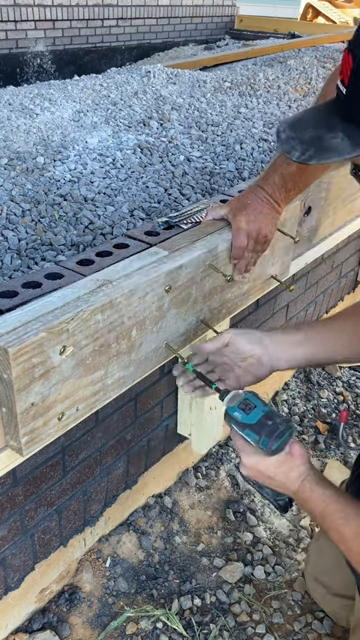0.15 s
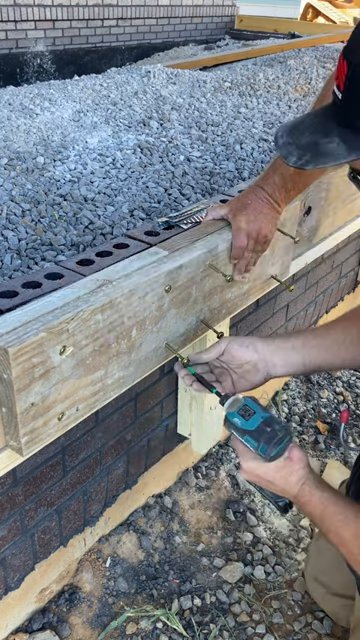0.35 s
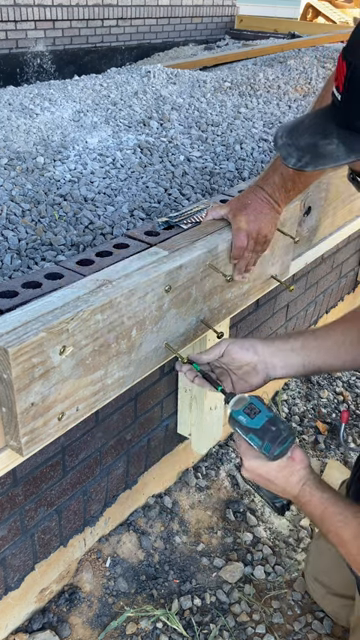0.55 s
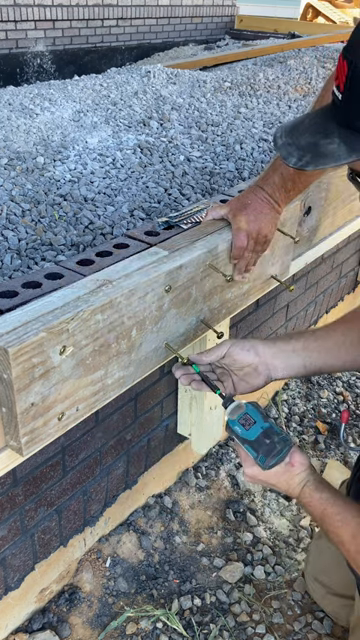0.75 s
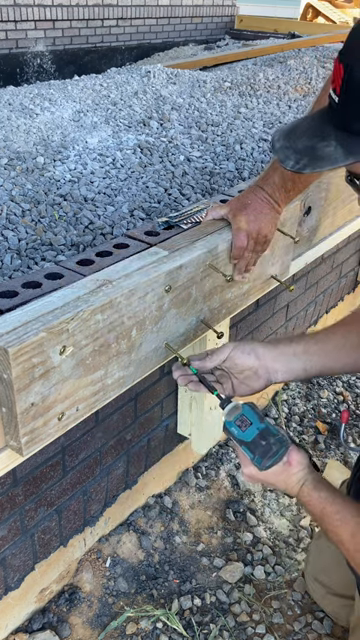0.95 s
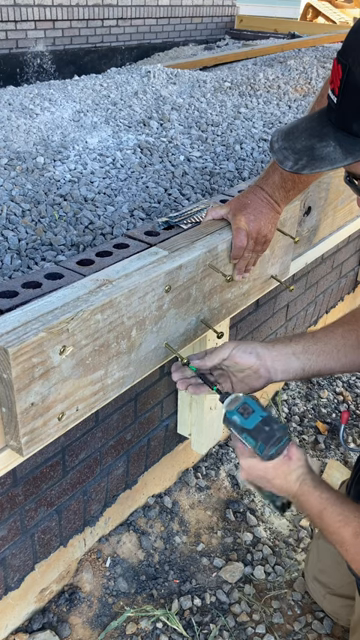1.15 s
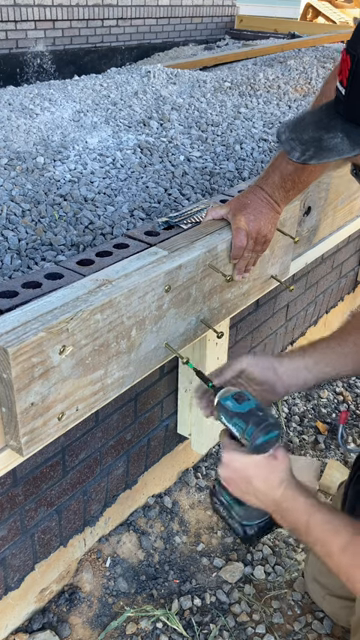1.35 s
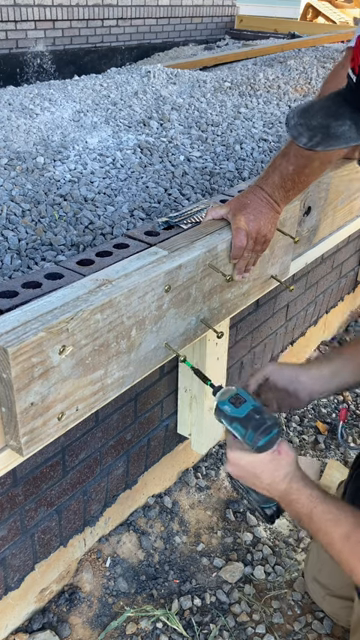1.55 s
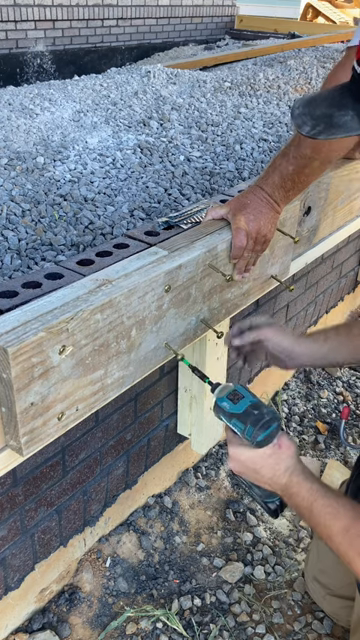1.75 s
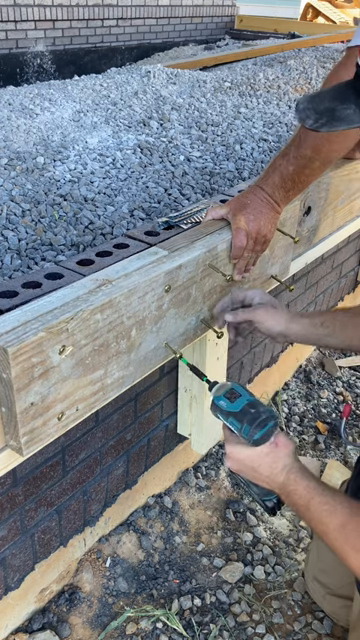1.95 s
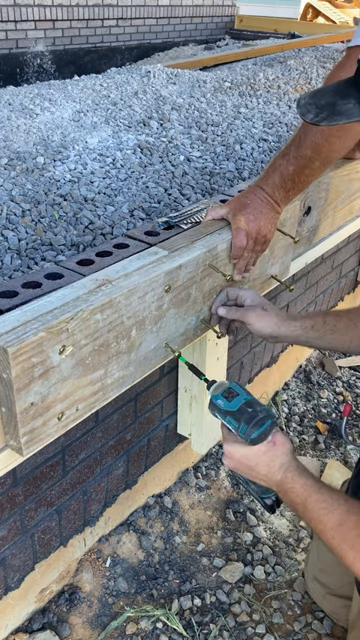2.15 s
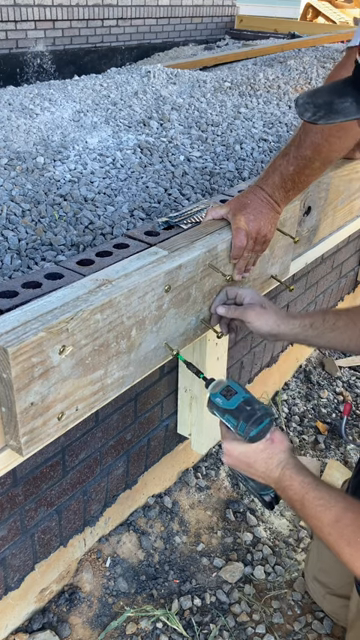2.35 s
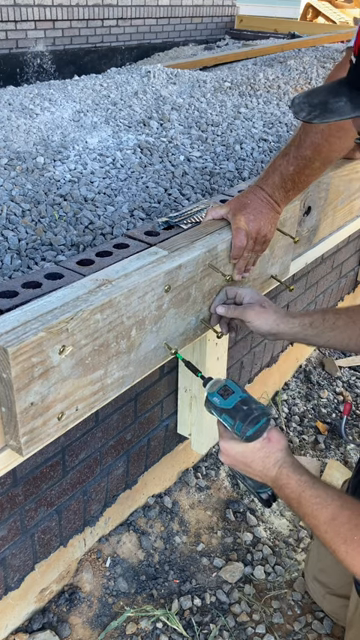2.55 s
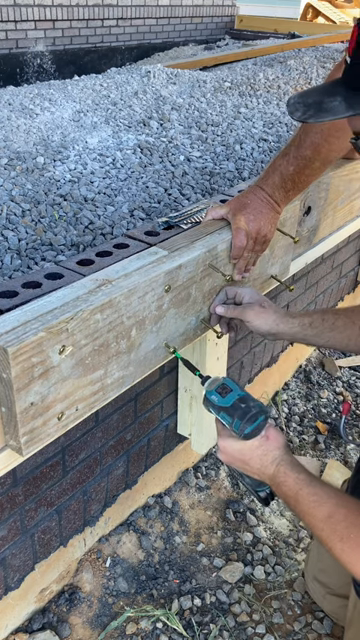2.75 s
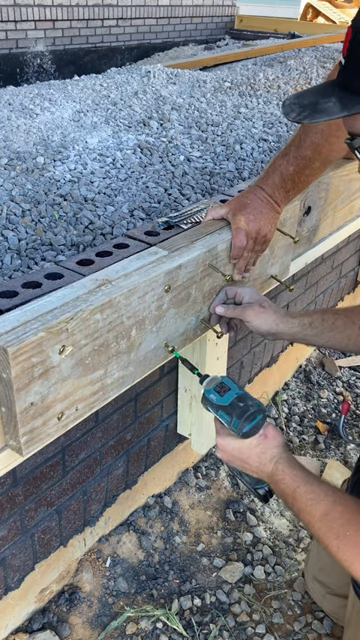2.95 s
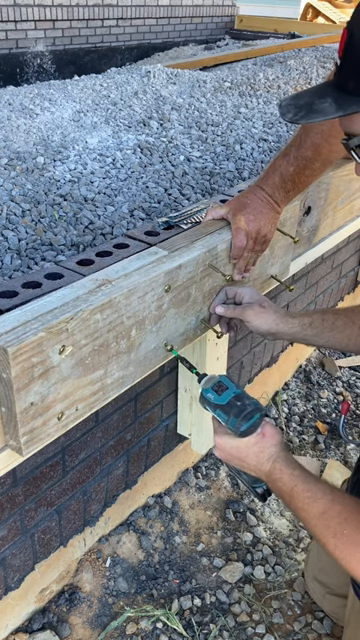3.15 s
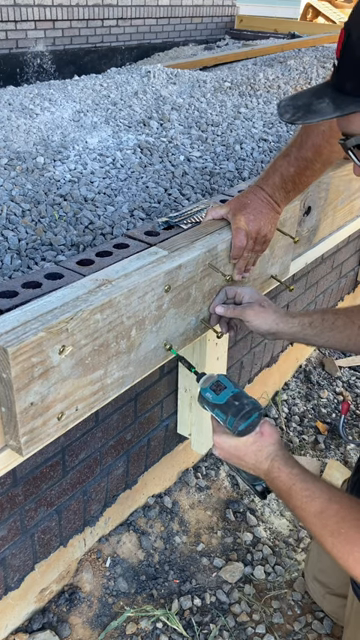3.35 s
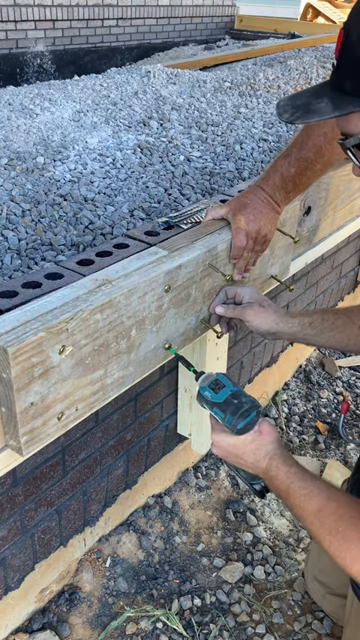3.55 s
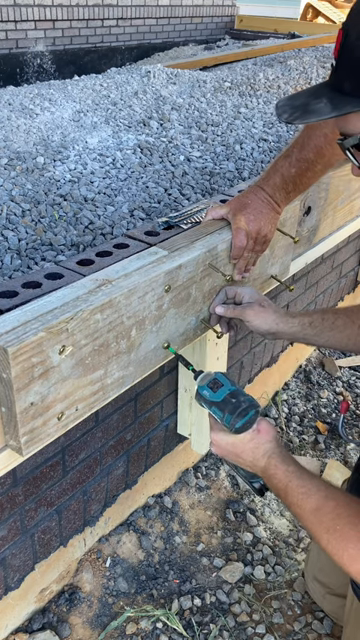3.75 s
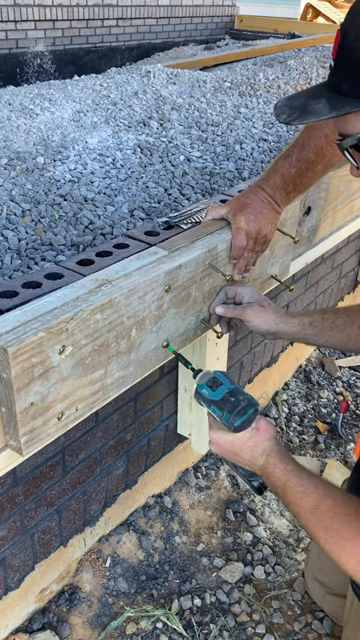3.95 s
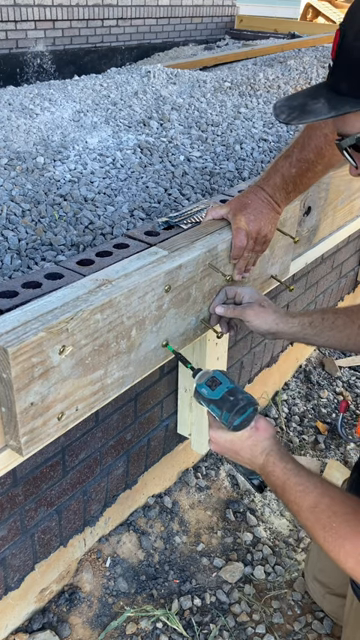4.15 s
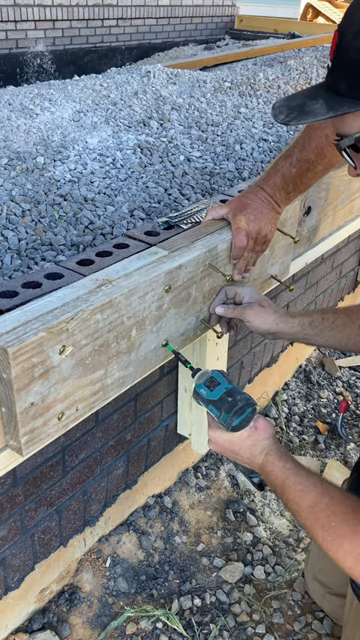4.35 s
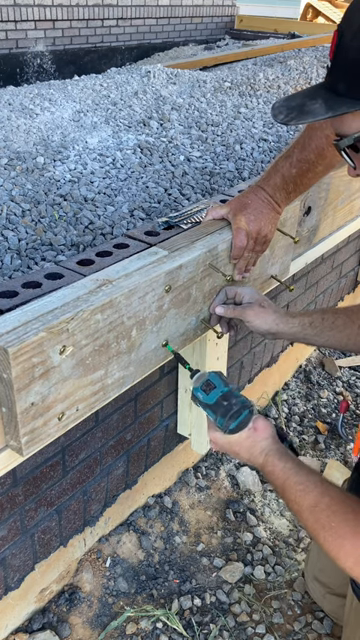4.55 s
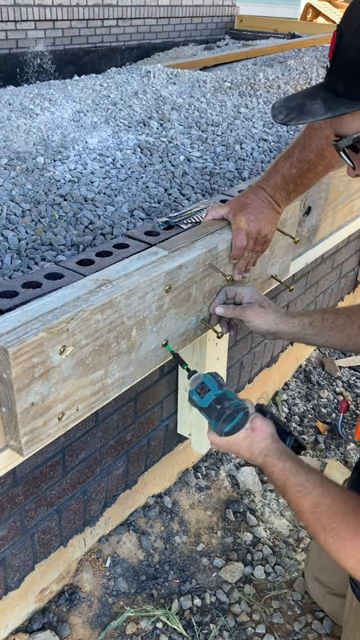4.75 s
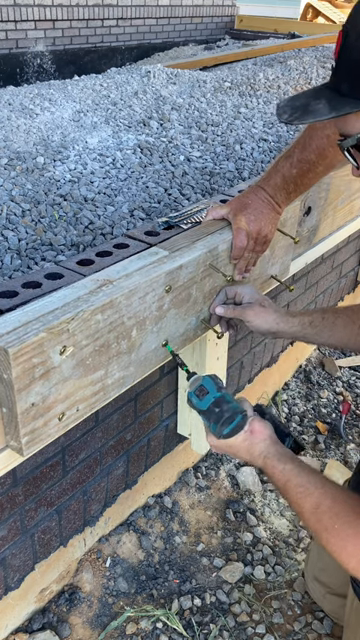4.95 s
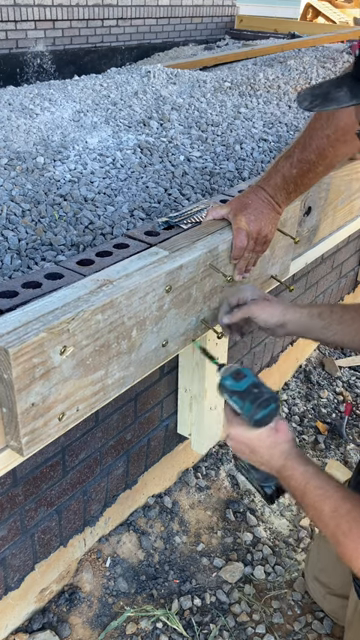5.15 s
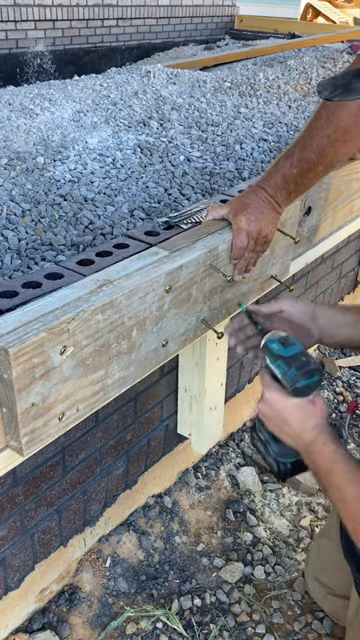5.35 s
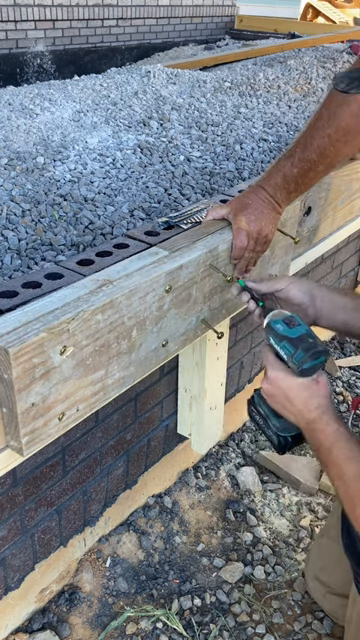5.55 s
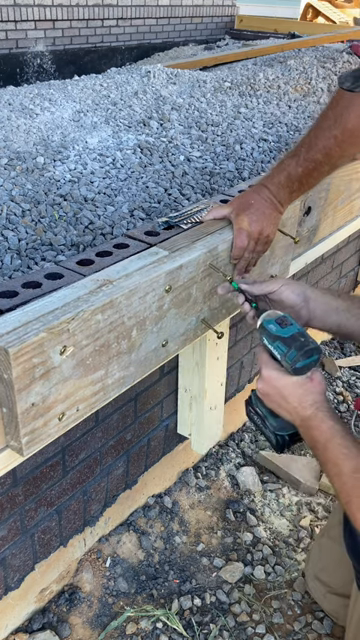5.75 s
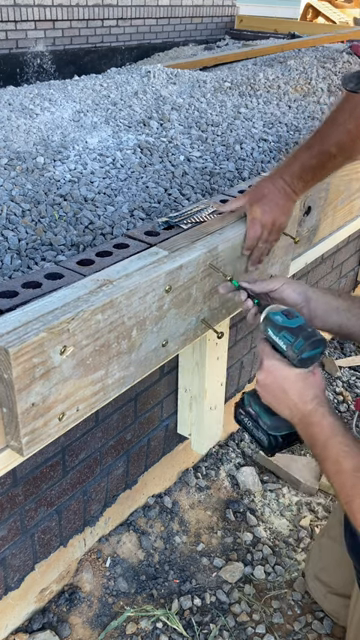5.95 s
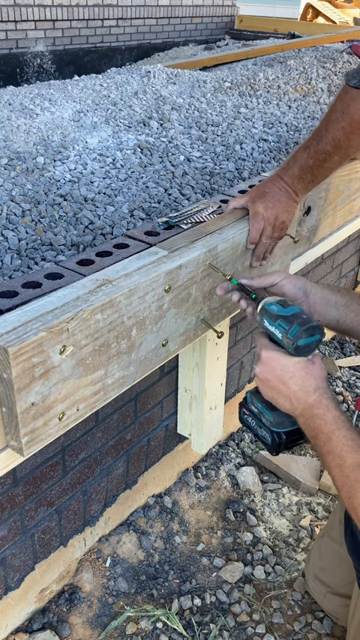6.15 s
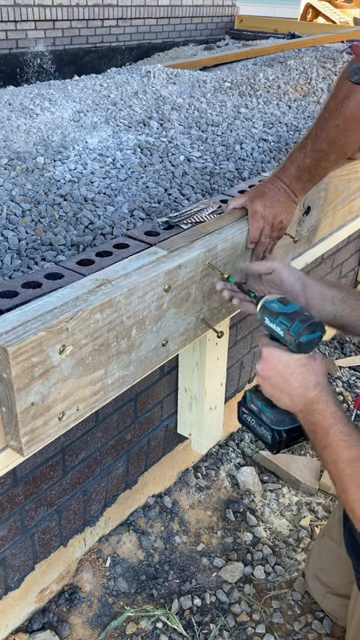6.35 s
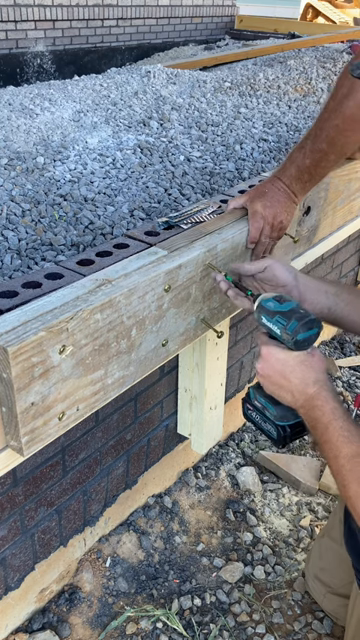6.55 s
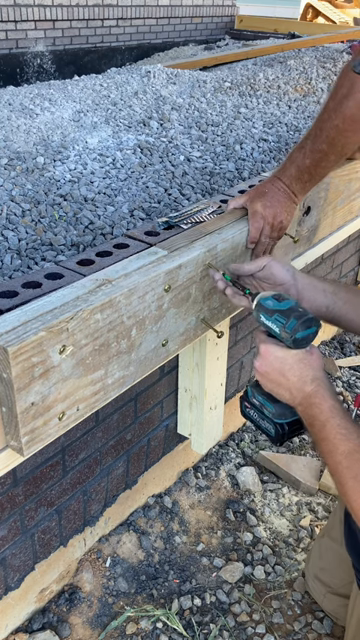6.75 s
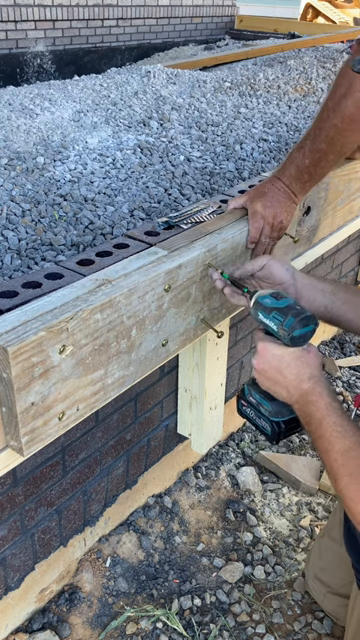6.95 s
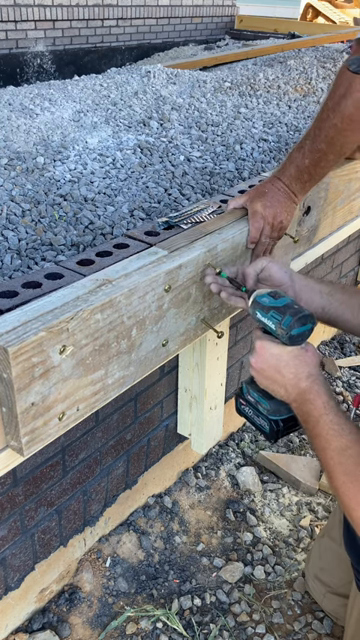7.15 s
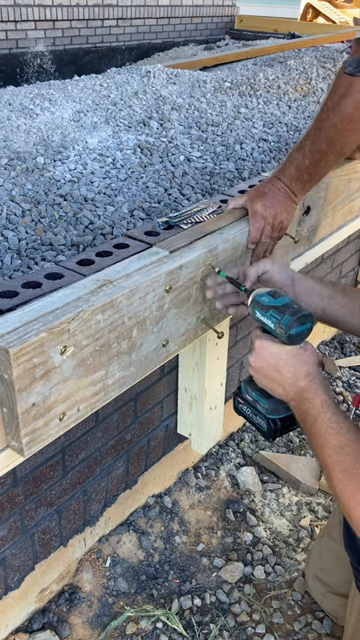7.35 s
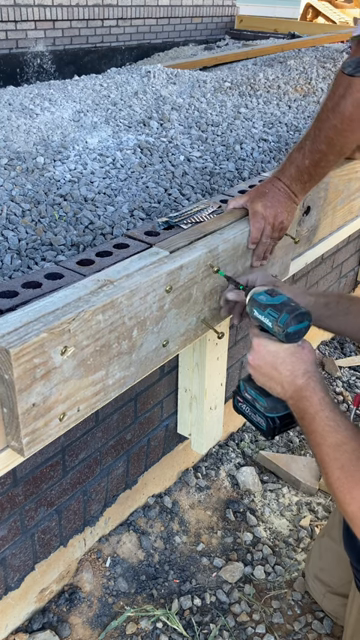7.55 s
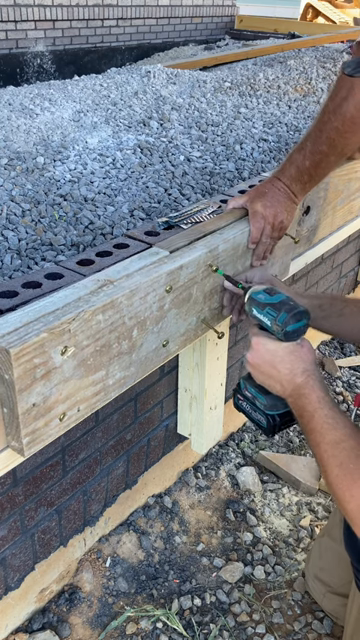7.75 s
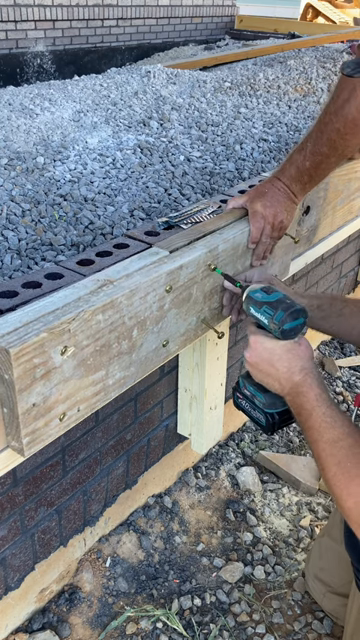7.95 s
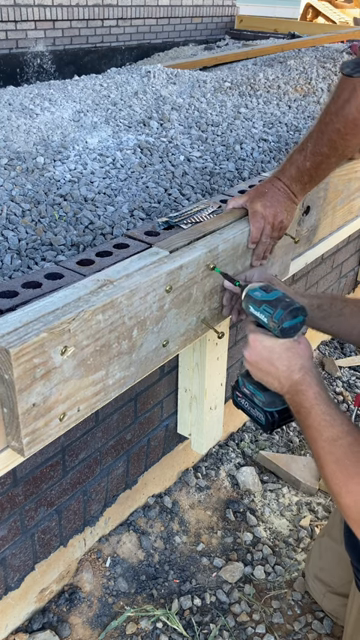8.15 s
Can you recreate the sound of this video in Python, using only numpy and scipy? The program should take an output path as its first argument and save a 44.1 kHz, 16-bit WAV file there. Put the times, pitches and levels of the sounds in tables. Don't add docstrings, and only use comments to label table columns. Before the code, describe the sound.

A cordless impact driver works on a building site, recorded close in stereo. Bright steel cracks at fifty to sixty blows per second ring the wood, over whining gear noise. One burst of about three seconds, a quick extra bite, a pause with small knocks and hand scuffs, then another sustained burst. Brick and gravel surroundings return short echoes; a faint engine hums far off.

```python
import sys
import numpy as np
from scipy import signal
from scipy.fft import rfft, irfft, next_fast_len
from scipy.io import wavfile
from scipy.ndimage import uniform_filter1d

SR = 44100
rng = np.random.default_rng(int(sys.argv[2]) if len(sys.argv) > 2 else 0)


def undo_db(level):
    steps = np.asarray(level, float) / 20
    return 10 ** steps


def bounce(signal):
    frames = np.transpose(np.atleast_2d(signal))
    limited = np.clip(frames, -1, 1)
    pcm = np.round(limited * 32767).astype(np.int16)
    wavfile.write(sys.argv[1], SR, pcm)


N = 362061
SPAN = next_fast_len(N)

# time [s], rate [blows per s].
HAMMER_PACE = [
    [(1.4006, 50.63), (1.707, 54.07), (1.98, 55.09), (2.625, 53.75), (3.105, 57.83), (3.336, 58.5),
     (3.845, 58.28), (4.05, 60.18), (4.569, 62.18)],
    [(4.6995, 61.71), (4.812, 63.73), (4.9245, 63.9)],
    [(6.3118, 52.54), (6.442, 50.29), (6.673, 53.35), (7.288, 53.96), (7.387, 52.16), (7.631, 54.11),
     (7.815, 56.43), (8.1995, 58.02)],
]
# time [s], blow strength [dB],
# grip of the screw on the beam [dB], loudest beam ring [Hz].
BLOW_WORK = [
    [(1.4, -30, -41.5, 583), (2.2, -29, -39.5, 470), (2.65, -28.5, -44.5, 510), (2.95, -30.5, -43.5, 557),
     (3.1, -30.5, -38.5, 610), (3.9, -31, -38, 550), (4.05, -30, -37, 700), (4.3, -25.5, -39.5, 690),
     (4.57, -26, -34, 716)],
    [(4.7, -28, -43.5, 673), (4.81, -26, -39.5, 715), (4.92, -29.5, -38.5, 710)],
    [(6.31, -30, -45, 655), (6.8, -31.5, -42, 470), (7.2, -30.5, -43, 560), (7.65, -30.5, -45.5, 660),
     (7.85, -33.5, -38, 633), (8.2, -33, -35, 660)],
]
# trigger [s], release [s], gear noise [dB].
TRIGGER_RUNS = [
    (1.38, 4.575, -42.5),
    (4.679, 4.93, -32.5),
    (6.284, 9.1, -39),
]
# from [s], to [s], slap re blow [dB], onset [s].
LOOSE_SPELLS = [
    (1.88, 2.11, -9.5, .12),
    (3.0, 4.14, -1.5, .25),
    (7.8, 8.3, -2.5, .12),
]
# centre [Hz], width [Hz], level [dB], quick t60 [s], slow t60 [s], slow part [dB].
STEEL_BANDS = [(1686, 690, -8, 0.0045, 0.041, -6.5), (3654, 2870, -6.5, 0.017, 0.094, -6.5),
               (5000, 3260, 3.5, 0.0059, 0.058, -14.5), (6380, 1360, -6, 0.011, 0.031, 1),
               (8588, 1820, 0.5, 0.0079, 0.033, -2), (9638, 1670, -2.5, 0.011, 0.046, -5),
               (13060, 2400, -12.5, 0.0089, 0.081, -3), (13630, 3600, 4.5, 0.002, 0.02, -10),
               (15410, 780, -5.5, 0.026, 0.023, 0)]
# frequency [Hz], level [dB], t60 [s].
BEAM_MODES = [
    [(420, -4.5, 0.02), (470, -0.5, 0.067), (538, -6.5, 0.066), (622, -3, 0.1), (677, -3, 0.046),
     (760, -3.5, 0.073), (882, 0.5, 0.043)],
    [(995, -6, 0.15), (1215.6, -3.5, 0.075), (1337, -24.5, 0.024), (1465, -7.5, 0.084), (1660, -13.5, .04),
     (1846, 1.5, 0.013)],
]
# level at first bite [dB], level when seated [dB].
SHAKE_DB = [(-49.5, -35), (-48, -53)]
# at first bite [Hz], when seated [Hz].
SHAKE_HZ = [(125, 340), (130, 380)]
# level at first bite [dB], level when seated [dB].
TOP_RING_DB = [(-37, -33.5), (-33.5, -45.5)]
# at first bite [Hz], when seated [Hz].
TOP_RING_HZ = [(1230, 1537), (1160, 1750)]
# frequency [Hz], level [dB per Hz].
GEAR_SPECTRUM = [(60, -20.5), (200, 1.5), (600, 4), (1000, 8), (1600, 9), (2500, -3.5), (5000, 8),
                 (9000, -8), (13000, -16.5), (16000, -21.5)]
# time [s], peak [dB], wood re peak [dB], steel re peak [dB], t60 [s].
HEAD_KNOCKS = [(0.168, -28.5, -23.5, -21, 0.033), (0.358, -59, -17, -13, 0.055),
               (0.5215, -55, -0.5, -33, 0.049), (0.8952, -47, -2.5, -9, 0.04),
               (0.955, -54, -15, -6.5, 0.053), (1.028, -74, 1, -28, 0.051), (1.1792, -50.5, -25, -1, 0.07),
               (1.2884, -85, -16, -8, 0.077), (1.336, -69, -24, -4, 0.12), (1.3858, -21.5, -19, -8, 0.1),
               (4.6864, -24.5, -11.5, 2.5, 0.096), (5.0897, -50, -12, -1, 0.088),
               (5.449, -55.5, -16, 7, 0.071), (5.683, -35.5, -19.5, -13, 0.038),
               (5.719, -67, 0.5, -19, 0.07), (5.916, -30, -29, -16, 0.04), (5.975, -36, -5.5, -26, 0.036),
               (6.1994, -60, -18, 1, 0.057), (6.2916, -23.5, -44.5, -1.5, 0.13)]
# frequency [Hz], level [dB], t60 [s].
KNOCK_RING = [(335, -5.5, 0.12), (474, -1, 0.073), (660, 8.5, 0.044), (790, 2.5, 0.027), (1133, -2, .03),
              (1787, -26.5, .04), (2500, -21, 0.025), (2980, -5, 0.017)]
# start [s], length [s], level [dB], centre [Hz], width [Hz].
SLIDES = [(0.42, 0.077, -70, 870, 1320), (.43, .06, -76.5, 3500, 2200), (0.517, 0.032, -54.5, 353, 402),
          (0.938, 0.034, -73, 3020, 3960), (1.018, 0.034, -67, 785, 990), (5.128, 0.48, -75.5, 760, 264),
          (4.997, .55, -88, 14500, 2225), (5.665, 0.11, -66.5, 493, 700), (5.781, 0.089, -66.5, 676, 1000),
          (5.79, 0.041, -80, 2800, 2500), (5.863, 0.21, -76, 8000, 5000), (5.899, 0.15, -61.5, 830, 1400),
          (6.169, 0.042, -77.5, 1970, 3020)]
# frequency [Hz], t60 [s].
WALL_DECAY = [(100, 0.51), (500, 0.34), (2000, 0.12), (8000, 0.14), (11000, 0.073), (16000, 0.16)]
# frequency [Hz], lead of left [radians].
PORT_LEAD = [(0, 0), (1200, -.4), (2700, 1.2), (5400, 3.14), (8500, 6.28), (11900, 9.42), (15200, 12.56),
             (22050, 18)]
# frequency [Hz], likeness [0-1].
PORT_LIKENESS = [(60, 0.92), (300, 0.92), (900, 0.047), (2000, 0.72), (3500, 0.36), (4600, 0.73),
                 (5500, 0.63), (8500, .92), (12000, 0.83), (16000, 1)]
# frequency [Hz], left minus right [dB].
PORT_BALANCE = [(60, 2), (180, 1.5), (550, -0.5), (1650, -2.5), (4970, -1), (15000, 0.5)]
# frequency [Hz], level [dB per Hz].
YARD_SPECTRUM = [(20, -38), (40, -25.5), (58, -4.5), (72, 9.5), (90, -4), (120, -3.5), (160, -7.5),
                 (300, -18), (600, -26.5), (1400, -39.5), (3000, -50), (10000, -54.5), (12000, -79)]
# time [s], level [dB].
YARD_LEVEL = [(0, 2.5), (.7, -0.5), (1.3, 0.5), (4.95, -1), (5.25, -8.5), (5.6, -7), (6.15, -2), (6.4, -20)]

YARD_DB = -63.5
FREE_PACE, SEATED_PACE = 51, 63
NEXT_SCREW_S = 5.6
SNUG_DB, SETTLE_S = -30, .1
TOP_GRIP = 0.9
EDGE_HZ = 15900


def evened(x):
    return x / np.sqrt(np.mean(x ** 2) + 1e-20)


def smooth_noise(count, size):
    return evened(uniform_filter1d(rng.standard_normal(count), size=size))


def read(points, hz):
    f, value = np.transpose(points)
    return np.interp(np.log(hz + 1), np.log(f + 1), value)


def coloured(points):
    hz = np.fft.rfftfreq(SPAN, 1 / SR)
    spectrum = rfft(rng.standard_normal((2, SPAN))) * undo_db(read(points, hz))
    return evened(irfft(spectrum, SPAN)[:, :N])


def wander(rate_hz):
    knots = rng.standard_normal((2, int(N / SR * 60) + 2))
    knots = evened(uniform_filter1d(knots, max(int(60 / rate_hz), 1)))
    at = np.arange(0, N, 32) * 60 / SR
    return np.array([np.interp(at, np.arange(len(k)), k) for k in knots])


def held(slow):
    return np.repeat(slow, 32, axis=-1)[..., :N]


def train(s, size):
    return np.bincount(np.clip((s * SR).astype(int), 0, N - 1), size, N)


def fade(x, t60):
    return signal.lfilter([1], [1, -10 ** (-3 / (t60 * SR))], x)


def ring(x, hz, t60):
    r = 10 ** (-3 / (t60 * SR))
    return np.sqrt(2 - 2 * r * r) * signal.lfilter([1], [1, -r * np.exp(2j * np.pi * hz / SR)], x)


def band(x, hz, width):
    edges = [hz - width / 2, hz + width / 2]
    return signal.sosfilt(signal.butter(2, edges, "band", fs=SR, output="sos"), x)


def near_db(hz, centre_hz, steep_db):
    return -np.minimum(steep_db * abs(np.log2(hz / centre_hz)), 14)


def blows():
    times = []
    for rows in HAMMER_PACE:
        s, pace = np.transpose(rows)
        t = np.arange(s[0], s[-1] + 44 / SR, 1 / SR)
        turns = np.cumsum(np.interp(t, s, pace)) / SR
        times += list(np.interp(np.arange(int(turns[-1]) + 1), turns, t))
    s, *columns = np.transpose(sum(BLOW_WORK, []))
    return np.array(times), [np.interp(times, s, c) for c in columns]


def depth(s):
    pace = np.interp(s, *np.transpose(sum(HAMMER_PACE, [])))
    return np.clip((pace - FREE_PACE) / (SEATED_PACE - FREE_PACE), 0, 1)


def sunk(ends, s):
    screw = 1 * (s > NEXT_SCREW_S)
    bite, seated = np.transpose(ends)[:, screw]
    return bite + (seated - bite) * depth(s)


def rebound(s):
    spells = []
    for on, off, db, onset in LOOSE_SPELLS:
        corners = [on - onset, on, off, off + SETTLE_S]
        spells.append(np.interp(s, corners, [SNUG_DB, db, db, SNUG_DB]))
    return np.max(spells, 0)


def steel(s, db, early_s, rebound_db):
    luck = 2 * np.tanh(rng.standard_normal((len(s), 2 + 2 * len(STEEL_BANDS))) / 2)
    at = s - .0006 + luck[:, 0] / 4000
    chatter = undo_db(3.0 * np.tanh(smooth_noise(N, 14) / 2))
    hiss = chatter * rng.standard_normal((2, N))
    out = 0
    for k, (hz, width, band_db, quick, slow, slow_db) in enumerate(STEEL_BANDS):
        hit_db = db + band_db + 0.28 * luck[:, 1] + 2.92 * luck[:, 2 + k]
        back_db = db + band_db + rebound_db + 3.5 * luck[:, -1 - k]
        hits = train(at, undo_db(hit_db))
        back = train(early_s, undo_db(back_db)) * (hz < 11000)
        shape = fade(hits + back, quick) + undo_db(slow_db) * fade(hits + .5 * back, slow)
        shape = uniform_filter1d(shape, size=26)
        out = out + band(shape * hiss, hz, width) * np.sqrt(SR / 2 / width)
    return undo_db(6.0) * out


def beam(s, levels_db, centres_hz, early_s, rebound_db):
    share = 1 / (1 + undo_db(-2 * rebound_db))
    lates_s, steeps_db = (.002, -.0005), (14, 18)  # middle, top; steepness in dB per octave
    out = 0
    for modes, level_db, late_s, steep_db, centre_hz in zip(
            BEAM_MODES, levels_db, lates_s, steeps_db, centres_hz):
        for hz, db, t60 in modes:
            luck_db = 2.5 * rng.standard_normal(len(s))
            size = undo_db(level_db + db + near_db(hz, centre_hz, steep_db) + luck_db)
            hits = train(s + late_s, size * np.sqrt(1 - share))
            hits = hits + train(early_s - .0005, size * np.sqrt(share))
            push = uniform_filter1d(hits, int(.4 * SR / hz)) * np.sqrt(SR / 30)
            grip = held(np.exp(.6j * wander(1.5) + 6j * rng.random((2, 1))))
            out = out + (ring(push, hz, t60) * grip).real
    return out


def thrum(s, level_db):
    t = np.arange(N) / SR
    turns = np.interp(t, s, np.arange(len(s)))
    pace = uniform_filter1d(np.gradient(turns) * SR, size=400)
    centre_hz = np.interp(t, s, sunk(SHAKE_HZ, s))
    out = 0
    for k, db in enumerate((-12.5, 2, -5.5, -3, -5, -3, -7), 1):
        loss_db = near_db(k * np.maximum(pace, 50), centre_hz, 11.0)
        size = undo_db(db + loss_db + 0.99 * held(wander(3.3)[0]))
        phase = 2 * np.pi * (k * turns + rng.random((2, 1))) + .3 * held(wander(8))
        out = out + size * np.cos(phase)
    running = uniform_filter1d(1. * (pace > 42), size=500)
    return out * running * undo_db(np.interp(t, s, level_db))


def gears():
    t, level = np.arange(N) / SR, 0
    for on, off, db in TRIGGER_RUNS:
        rise_db = 830 * np.maximum(on + 0.021 - t, 0)
        fall_db = 1400 * np.maximum(t - off, 0)
        level = level + undo_db(db - rise_db - fall_db)
    return level * held(undo_db(2.3 * wander(30))) * coloured(GEAR_SPECTRUM)


def knocks():
    s, db, wood_db, steel_db, t60 = np.transpose(HEAD_KNOCKS)
    wood = 0
    for hz, mode_db, mode_t60 in KNOCK_RING:
        size = undo_db(db + wood_db + 35 + 5.2 * rng.standard_normal(len(s)))
        wood = wood + undo_db(mode_db) * ring(train(s, size), hz, mode_t60).real
    out = undo_db(-24) * wood * np.ones((2, 1))
    for at, peak_db, tick_db, ring_s in zip(s, db, steel_db, t60):
        t = np.arange(4000) / SR
        hiss = rng.standard_normal((2, 2, len(t))) * np.minimum(t / 0.0033, 1)
        clack = band(hiss[0], 3200, 2000) * undo_db(peak_db - 4 - 60 * t / np.clip(ring_s, .01, .3))
        tick = band(hiss[1], 8000, 5396) * undo_db(peak_db + tick_db + 15 - 60 * t / 0.011)
        out[:, round(at * SR):][:, :len(t)] += clack + tick
    return out


def scuffs():
    out = np.zeros((2, N))
    for s, length, db, hz, width in SLIDES:
        t = np.arange(0, 1, 1 / (length * SR))
        grit = undo_db(1.9 * smooth_noise(25000, 150))[:len(t)]
        hiss = band(rng.standard_normal((2, 25000)), hz, min(width, 1.8 * hz))[:, :len(t)]
        stroke = np.sin(np.pi * t ** 0.73)
        out[:, round(s * SR):][:, :len(t)] += undo_db(db) * evened(hiss) * grit * stroke
    return out


def walls(x):
    taps = np.zeros((2, SR))
    at = np.arange(300, SR - 20, 20) + rng.integers(0, 20, (2, (SR - 301) // 20))
    np.put_along_axis(taps, at, rng.choice([-1., 1.], at.shape), 1)
    hz, t, z = signal.stft(taps, SR, nperseg=256)
    hz = hz[:, None]
    near = undo_db(-60 * t / read(WALL_DECAY, hz))
    far_colour = (1 + 900 / (hz + 500)) / (1 + (hz / 9500) ** 12)
    far = undo_db(-37 - 60 * t / 1.5) * far_colour
    tail = signal.istft(z * (near + far), SR, nperseg=256)[1]
    return signal.fftconvolve(x, tail / np.linalg.norm(tail[0]), axes=1)[:, :N]


def ports(twins):
    hz = np.fft.rfftfreq(SPAN, 1 / SR)
    a, b = rfft(twins, SPAN)
    same = np.clip(read(PORT_LIKENESS, hz), 0, 1)
    side = undo_db(read(PORT_BALANCE, hz) / 2)
    lead = np.exp(1j * np.interp(hz, *np.transpose(PORT_LEAD)))
    left = a * side
    right = (same * a / lead + np.sqrt(1 - same ** 2) * b) / side
    return irfft(np.array([left, right]), SPAN)[:, :N]


def yard():
    swell_db = np.interp(np.arange(N) / SR, *np.transpose(YARD_LEVEL))
    level = undo_db(YARD_DB + swell_db + 0.7 * held(wander(2.0)[0]))
    left, other = coloured(YARD_SPECTRUM) * level
    return np.array([left * undo_db(2.0), .85 * left + .5 * other])


def scene():
    s, (steel_db, grip_db, ring_hz) = blows()
    early_s = s - .0053 + .0003 * rng.standard_normal(len(s))
    rebound_db = rebound(s)
    top_db = sunk(TOP_RING_DB, s) + TOP_GRIP * (grip_db - grip_db.mean())
    driver = steel(s, steel_db, early_s, rebound_db + 1.5)
    driver = driver + beam(s, (grip_db, top_db), (ring_hz, sunk(TOP_RING_HZ, s)), early_s, rebound_db)
    driver = driver + gears() + thrum(s, sunk(SHAKE_DB, s))
    contacts = knocks() + scuffs()
    echoes = walls(undo_db(-14.0) * driver + undo_db(-9.0) * contacts)
    return ports(driver + contacts + echoes) + yard()


def top_cut(x):
    return signal.sosfilt(signal.butter(12, 17150, fs=SR, output="sos"), x)


def record(dry):
    edge = signal.firwin(301, EDGE_HZ, window=("kaiser", 4), fs=SR)
    mix = signal.oaconvolve(np.tanh(dry), edge[None], "same")
    return top_cut(mix)


dry = scene()
out = record(dry)
bounce(out)
```